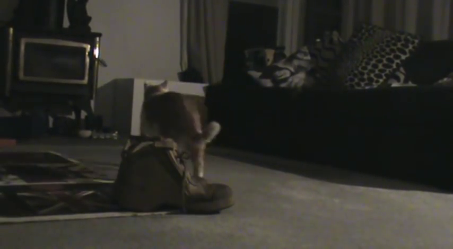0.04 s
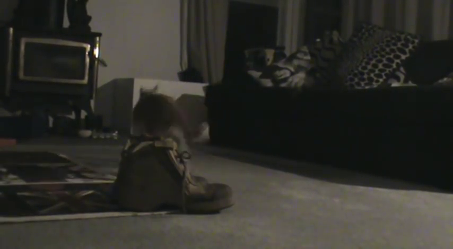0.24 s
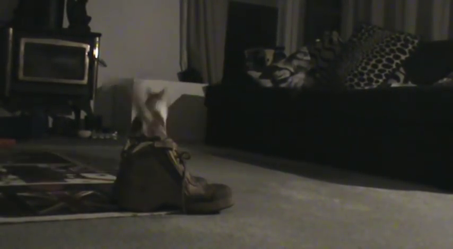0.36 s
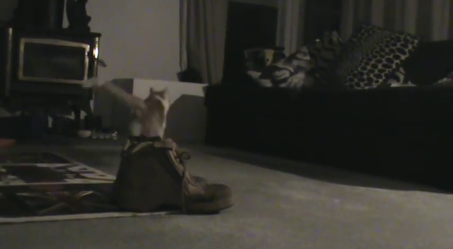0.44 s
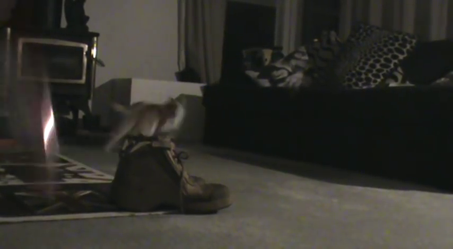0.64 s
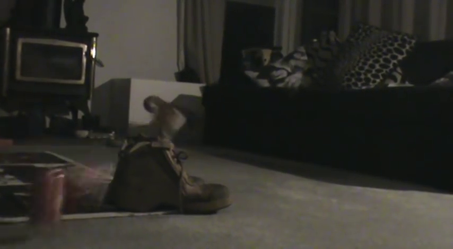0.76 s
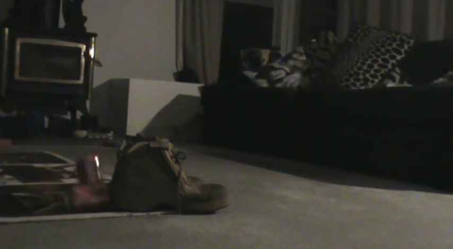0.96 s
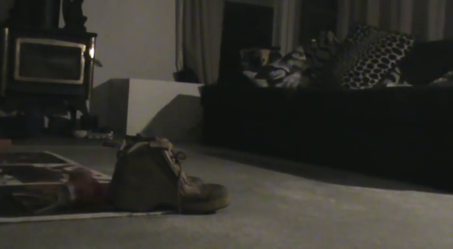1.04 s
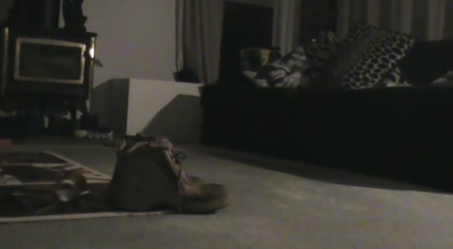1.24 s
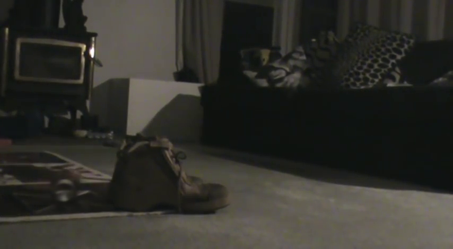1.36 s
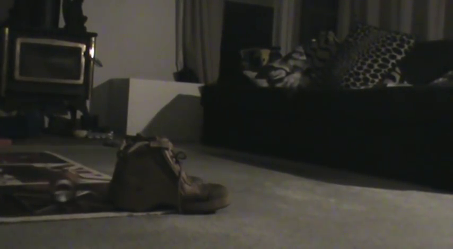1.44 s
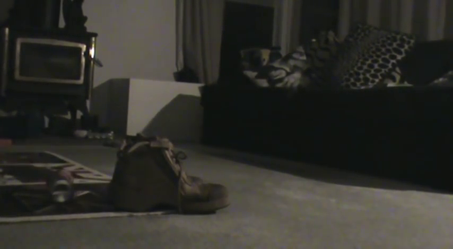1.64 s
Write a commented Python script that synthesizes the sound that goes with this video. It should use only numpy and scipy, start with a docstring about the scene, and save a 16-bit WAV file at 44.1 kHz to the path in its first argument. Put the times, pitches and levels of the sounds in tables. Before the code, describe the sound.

Metal cans clatter across a quiet living room, pulled by a running cat. Faint scraping and low thumps come first, then a loud, close burst of bright rattling that thins into a few hollow knocks over a low hum.

```python
"""Empty tin cans, dragged by a cat bolting across a quiet living room.
The cans scrape in three tugs, crash together close by, tumble with ringing rims and settle on the rug.
Scrapes and crashes are dense tiny contacts driving the wall modes; single knocks ring damped modes.
Paws and cans thud on the floor; a low hum fills the room."""
import sys
import numpy as np
from scipy import signal
from scipy.io import wavfile
from scipy.ndimage import uniform_filter1d

SR = 44100
rng = np.random.default_rng(int(sys.argv[2]) if len(sys.argv) > 2 else 0)


def generate_wav(signal):
    """Clip the signal to [-1, 1] and save it as 16-bit WAV at the path in sys.argv[1]."""
    frames = np.transpose(np.atleast_2d(signal))
    scaled = np.clip(frames, -1, 1) * 32767
    pcm = np.round(scaled).astype(np.int16)
    wavfile.write(sys.argv[1], SR, pcm)


N = 74970

# room hum (frequency [Hz], level [dB])
HUM_TONES = [(145.5, -54.5), (54, -61), (1260, -76), (1157, -80)]
# air noise (frequency [Hz], gain [dB])
AIR_SHAPE = [(25, -7.5), (60, -3), (110, -14), (220, -27.5), (400, -17), (800, -24.5), (1200, -24.5),
             (2000, -30), (7700, -32.5), (16000, -32.5)]
# surges within the tugs
# (time [s], rise [s], hold [s], t60 [s], level [dB], low-mid [dB], treble [dB], ring [dB])
SURGES = [(0.139, 0.089, 0.011, 0.085, -48, 13, 10, 10), (0.189, .042, 0.019, 0.26, -27.5, -1, 2, 2.5),
          (0.322, 0.0077, 0.062, 0.18, -41.5, 7.5, -7, -2.5),
          (0.423, .002, 0.014, 0.14, -34.5, 2.5, 6.5, -11), (.436, 0.014, .01, 0.26, -35.5, -3.5, -0.5, -6),
          (0.511, 0.0093, .012, .12, -38, -27, 11, -8), (0.565, 0.0041, 0.081, .1, -36.5, 7, 6, -20.5),
          (0.606, 0.0047, 0.077, 0.24, -35, -4.5, 1.5, 1.5),
          (0.671, 0.0091, 0.026, 0.17, -45.5, 2, 0.5, -10.5)]
# scraping (frequency [Hz], gain [dB])
SCRAPE_SHAPE = [(100, -40.5), (300, -8.5), (700, 1), (1100, -1), (1900, -4), (2800, -5), (4200, 6),
                (5900, 2.5), (7400, -7.5), (10500, -7), (16000, -20.5)]
# dragged can wall (frequency [Hz], level [dB], t60 [s])
DRAG_MODES = [(378, -19, .12), (530, -15, .16), (980, -22, .1), (1140, -21, .15), (1240, -20, .25),
              (1500, -20, .2), (1812, -16, .25), (2420, -19, .35), (3070, -21, .2), (3750, -19, .14),
              (4130, -17, .14), (5210, -18, .1), (5550, -19, .1), (6020, -18, .12), (8500, -24, .1)]
# drag ticks (time [s], level [dB])
TICKS = [(.2002, -25.5), (.2321, -18), (.309, -39), (.322, -38.5), (.346, -37), (.366, -35.5), (.381, -26),
         (.391, -35), (.439, -24), (.4465, -19.5), (.4515, -29), (.523, -35.5), (.5635, -29.5), (.579, -32),
         (.611, -24.5), (.629, -24)]
# collisions (time [s], strike [dB], chatter [dB], hold [s], t60 [s], low-mid [dB], treble [dB])
CRASHES = [(0.7154, -16, -19.5, 0.011, 0.3, 5, 4), (0.732, -13, -16.5, 0.034, 0.075, -1, -2),
           (0.755, -9, -24, 0.004, 0.096, 8.5, 3), (0.771, -28, -18.5, 0.0033, 0.12, 2, -8),
           (0.79, -19, -17, 0.023, .14, -9, 1.5), (.809, -13, -22.5, 0.023, 0.22, -1.5, -1),
           (0.855, -22, -26, 0.0096, 0.041, 1, 7), (.884, -24, -19.5, 0.029, .18, 5.5, -5),
           (0.928, -13.5, -30.5, 0.014, 0.45, 7.5, -7), (.937, -12, -24, 0.033, 0.076, 0, -0.5),
           (0.98, -24, -33.5, 0.0092, 0.088, 0, 14), (.987, -29, -24, 0.043, 0.25, -6.5, 3),
           (1.007, -9.5, -23.5, 0.02, 0.22, 6, 0.5), (1.052, -21, -21, 0.008, 0.22, -1.5, -8),
           (1.067, -9.5, -40, 0.0076, 0.092, -6, 1), (1.094, -13, -29.5, 0.014, 0.29, 2, 0),
           (1.113, -35, -30, 0.0044, .1, -11, 10.5), (1.124, -16.5, -25, 0.035, 0.097, -5.5, 3),
           (1.136, -19.5, -35, 0.004, 0.18, -2, 8), (1.153, -31, -33, 0.019, 0.26, -13, 9),
           (1.183, -35, -31.5, 0.015, 0.3, 2, -30), (1.226, -21, -30, 0.016, .12, 6.5, 0.5),
           (1.246, -19, -34, .005, 0.11, 4, -2), (1.262, -27, -32.5, .005, 0.076, 3, 6),
           (1.275, -22, -30.5, 0.02, 0.31, 3, 2), (1.369, -40, -38, .005, .1, 0, 9),
           (1.379, -25, -34.5, 0.029, 0.11, -3, 4.5), (1.4378, -20, -39, 0.015, 0.2, 4, 1),
           (1.45, -27, -39, 0.022, 0.13, -1, -1)]
# collision noise (frequency [Hz], gain [dB])
CRASH_SHAPE = [(70, -17), (150, 0), (240, -4), (400, -1.5), (720, -5.5), (1050, -3.5), (1550, -3.5),
               (2200, 1.5), (3000, 0), (3750, 6), (4600, 0.5), (5900, 2), (7100, -8), (9300, -4),
               (11600, -6), (16000, -18.5)]
# struck can wall (frequency [Hz], level [dB], t60 [s])
CRASH_MODES = [(368, -27, .15), (538, -24, .2), (1003, -17, .22), (1110, -23, .22), (1452, -21, .25),
               (1805, -16, .25), (2160, -21, .22), (2300, -22, .22), (2780, -23, .2), (3200, -21, .25),
               (3443, -20, .2), (3690, -18, .18), (3880, -20, .18), (4015, -22, .16), (4650, -23, .15),
               (6030, -23, .15)]

# strikes (time [s], level [dB], pitch [Hz]), each with its modes (pitch ratio, level [dB], t60 [s])
# can rims
RIM_HITS = [(.145, -53, 5400), (.165, -47, 5730), (.182, -32, 5420), (.566, -20.5, 5400),
            (.646, -15.5, 4990), (.658, -20, 5500), (.668, -17, 5300), (.6806, -15.5, 5270),
            (.691, -21, 4920), (.873, -5, 5266), (.883, -10, 5600), (.891, -14.5, 5380), (.8985, -15, 5030),
            (.9045, -13.5, 5220), (.929, -7, 5330), (.9385, -11.5, 5275), (.9785, -7, 5210),
            (.987, -7, 5115), (.994, -9, 5210), (1.0015, -6.5, 5120), (1.0145, -7, 5120),
            (1.033, -12, 5210), (1.044, -11, 5090), (1.058, -7, 5180), (1.072, -14, 5170),
            (1.086, -18.5, 5030), (1.126, -16.5, 5180), (1.134, -19, 5210), (1.146, -16.5, 5240),
            (1.154, -29, 5300), (1.265, -17, 5250), (1.274, -17, 5210), (1.296, -17.5, 5230),
            (1.312, -22, 5280), (1.322, -24, 5070), (1.395, -22, 5170), (1.412, -28, 5220)]
RIM_MODES = [(1, 0, .03), (1.045, -10, .02), (.992, -18, .18), (1.012, -19, .18), (.955, -19, .02),
             (1.14, -15, .035), (.695, -14, .05)]
# distant cans
CLANKS = [(.2005, -27.5, 1150), (.211, -34, 1490), (.335, -39, 1200), (.353, -42, 1450),
          (.4465, -21.5, 1790), (.4515, -24, 1550), (.465, -36, 1800), (.492, -35, 1263),
          (.648, -25.5, 1700), (.658, -26, 2360)]
CLANK_MODES = [(1, -2.5, 0.063), (1.17, -6.5, 0.028), (1.35, -5.5, 0.052), (0.822, -8, 0.048),
               (0.67, -4.5, 0.0067), (1.7, -9, 0.014), (1.3, -13, .015)]
# large can body
BOOMS = [(.212, -29.5, 378.5), (.254, -32, 385), (.446, -34, 387.2), (.628, -29, 374.4)]
BOOM_MODES = [(1, 0, .16), (1.42, -8, .13), (1.58, -11, .1), (4.8, -14, .25), (6.42, -14, .3)]
# floor
THUDS = [(.318, -27, 103.5), (.345, -30, 83), (.39, -39, 78), (.52, -34.5, 126.5), (.61, -23, 101),
         (.65, -41, 77), (.718, -15, 112.3), (.757, -24.5, 93), (.835, -27.5, 137), (.9, -27, 80),
         (.95, -52.5, 90), (1.03, -28.5, 71), (1.11, -29, 70), (1.228, -34, 155), (1.29, -38, 71.6),
         (1.33, -35.5, 121), (1.39, -36, 69)]
FLOOR_MODES = [(1.03, 1, 0.11), (0.73, -11.5, 0.25), (1.632, 0, .11), (2.7, -5, 0.051)]
# can base
BASE_HITS = [(.735, -17.5, 1024), (.762, -23, 1000), (.886, -22, 989), (1.008, -23, 1011),
             (1.066, -21, 1017), (1.112, -23.5, 1033), (1.164, -22, 1015), (1.3725, -20, 993),
             (1.3805, -35, 1002), (1.3955, -23.5, 1013), (1.4365, -26, 1108), (1.463, -31, 1109),
             (1.483, -39.5, 1083)]
BASE_MODES = [(1, -1, 0.15), (1.1, -10, 0.27), (1.26, -16, 0.26), (1.39, -12, 0.18), (1.94, -15.5, 0.22),
              (2.08, -12.5, 0.28), (2.88, -15.5, .2), (3.37, -14, 0.18)]
# close bump
BUMPS = [(.9715, -9, 364)]
BUMP_MODES = [(1.09, 2.5, 0.011), (0.84, -18, 0.03), (1.5, -0.5, 0.0063)]
# thin edges
EDGE_HITS = [(1.058, -19, 9500), (1.0665, -23, 9300), (1.073, -18, 9750), (1.387, -27.5, 11900),
             (1.395, -23.5, 10300), (1.402, -28.5, 12500), (1.444, -28, 9000), (1.452, -38, 9500),
             (1.458, -24, 9300)]
EDGE_MODES = [(1, 0, .028), (.93, -7, .015), (1.03, -7, .02)]

# room decay (frequency [Hz], t60 [s])
ROOM_T60 = [(100, .4), (500, .28), (1500, .32), (3200, .34), (5500, .29), (9500, .24), (14000, .21)]
# reverb side signal (frequency [Hz], gain [dB])
SIDE_SHAPE = [(80, -10), (180, -7), (350, 1.5), (1100, -5.5), (4000, -10), (9000, -1.5), (15000, -1.5)]
# left microphone, mirrored for the right (frequency [Hz], gain [dB])
LEFT_SHAPE = [(100, .2), (400, 1.2), (1200, .7), (2800, -.1), (6000, .3), (13000, .6)]

GRAINS_PER_S, GRAIN_SPREAD_DB, SNAP_DECAY_S = 5000, 3, 0.0013
SPOT_DETUNE_RATIO, SPOT_SPREAD_DB, BUZZ_BANDWIDTH_HZ = .006, 2.2, 330
LOW_CUT_HZ, CEILING_DB, RECOVERY_DB_PER_S = 42.5, -4, 350


def amp(db):
    """dB to gain."""
    return 10 ** (np.asarray(db) / 20)


def unit_rms(x):
    """Scale to rms 1."""
    return x / np.sqrt(np.mean(x ** 2) + 1e-20)


def lookup(points, hz):
    """Interpolate over log frequency."""
    points_hz, values = np.transpose(points)
    return np.interp(np.log(hz + 1), np.log(points_hz + 1), values)


def add(mix, time_s, sound):
    """Mix in at time_s."""
    part = mix[max(round(time_s * SR), 0):][:len(sound)]
    part += sound[:len(part)]


def colour(x, shape, keep_power=False):
    """Minimum-phase filter from (frequency [Hz], gain [dB]) points."""
    log_gain = np.log(amp(lookup(shape, abs(np.fft.fftfreq(2048, 1 / SR)))))
    taps = np.fft.ifft(np.exp(np.conj(signal.hilbert(log_gain)))).real[:1024]
    return signal.fftconvolve(x, taps / (np.linalg.norm(taps) if keep_power else 1))[:len(x)]


def tilt(x, low_db, treble_db):
    """Low-mid and treble shelves."""
    return colour(x, [(1300, low_db), (3400, 0.01), (5500, 0), (11000, treble_db)])


def grains(size):
    """Dense tiny contacts of uneven strength."""
    strength = amp(GRAIN_SPREAD_DB * np.minimum(rng.exponential(1, size), 4))
    return unit_rms(strength * rng.choice([-1, 1], size) * (rng.random(size) < GRAINS_PER_S / SR))


def snap(t):
    """Noise burst at first contact."""
    return np.exp(-t / SNAP_DECAY_S) * rng.choice([-1, 1], len(t))


def can_wall(drive, shape, modes, ring_db):
    """Contact noise plus the wall modes it rings, varied per contact spot."""
    t = np.arange(len(drive)) / SR
    ring = 0
    for (hz, db, t60_s), (shift, strength) in zip(modes, rng.standard_normal((len(modes), 2))):
        mode = amp(-60 * t / t60_s) * np.sin(2 * np.pi * hz * (1 + SPOT_DETUNE_RATIO * shift) * t)
        ring += amp(db + SPOT_SPREAD_DB * strength) * np.sign(shift) * mode / np.linalg.norm(mode)
    direct = colour(drive, shape, keep_power=True)
    return direct + amp(ring_db) * signal.fftconvolve(drive, ring)[:len(t)]


def strikes(hits, modes, attack_s, buzz_depth=0):
    """Damped modes at each hit's pitch; loose contact adds buzz."""
    out, t = np.zeros(N), np.arange(SR // 4) / SR
    lowpass = signal.butter(2, BUZZ_BANDWIDTH_HZ, fs=SR)
    attack = 1 - np.exp(-t / attack_s)
    for time_s, db, hz in hits:
        detunes = 1 + .004 * rng.standard_normal(len(modes))
        ring = sum(amp(mode_db - 60 * t / t60_s) * np.exp(2j * np.pi * hz * ratio * detune * t)
                   for (ratio, mode_db, t60_s), detune in zip(modes, detunes))
        noise = unit_rms(signal.lfilter(*lowpass, rng.standard_normal((2, len(t)))))
        buzz = 1 + buzz_depth * (noise[0] + 1j * noise[1])
        add(out, time_s, amp(db) * (ring * buzz).imag * attack)
    return out


def room_tone(air_db=-58):
    """Low hum over faint stereo air noise."""
    t = np.arange(N) / SR
    hum = sum(np.sqrt(2) * amp(db) * np.sin(2 * np.pi * (hz * t + rng.random())) for hz, db in HUM_TONES)
    mid, left, right = [unit_rms(colour(rng.standard_normal(N), AIR_SHAPE)) for _ in range(3)]
    return hum + amp(air_db) * (mid + .5 * np.array([left, right]))


def dragging():
    """Tugged cans scrape in surges; small ticks stand out."""
    out, t = np.zeros(N), np.arange(SR // 2) / SR
    for time_s, rise_s, hold_s, t60_s, db, low_db, treble_db, ring_db in SURGES:
        envelope = np.minimum(t / rise_s, 1) * amp(db - 60 * np.maximum(t - rise_s - hold_s, 0) / t60_s)
        drive = tilt(envelope * grains(len(t)), low_db, treble_db)
        add(out, time_s, can_wall(drive, SCRAPE_SHAPE, DRAG_MODES, ring_db))
    for time_s, db in TICKS:
        add(out, time_s, can_wall(amp(db) * snap(t), SCRAPE_SHAPE, DRAG_MODES, ring_db=-4))
    return out


def rim_rings():
    """Struck rims ring in close, high modes."""
    return strikes(RIM_HITS, RIM_MODES, attack_s=.0003, buzz_depth=.16)


def clanks():
    """Dragged cans knock farther off."""
    return strikes(CLANKS, CLANK_MODES, attack_s=.00024, buzz_depth=.25)


def booms():
    """A large can booms when jerked."""
    return strikes(BOOMS, BOOM_MODES, attack_s=.0029)


def floor_thuds():
    """Paws and cans ring low floor modes."""
    return strikes(THUDS, FLOOR_MODES, attack_s=.0023)


def crashes():
    """Cans collide: a sharp strike, then thin walls chatter."""
    out, t = np.zeros(N), np.arange(SR // 3) / SR
    for time_s, strike_db, chatter_db, hold_s, t60_s, low_db, treble_db in CRASHES:
        chatter = amp(chatter_db - 60 * np.maximum(t - hold_s, 0) / t60_s) * grains(len(t))
        drive = tilt(amp(strike_db) * snap(t) + chatter, low_db, treble_db)
        add(out, time_s, can_wall(drive, CRASH_SHAPE, CRASH_MODES, ring_db=-2.5))
    return out


def base_knocks():
    """A struck can base rings hollow."""
    return strikes(BASE_HITS, BASE_MODES, attack_s=.001, buzz_depth=.084)


def bump():
    """One close, heavily damped knock."""
    return strikes(BUMPS, BUMP_MODES, attack_s=.00043)


def edge_tinks():
    """Thin edges touch lightly and buzz."""
    return strikes(EDGE_HITS, EDGE_MODES, attack_s=.00031, buzz_depth=.51)


def reflections(taps_per_s=4000, predelay_s=.004):
    """Sparse room response, decaying per band."""
    taps = rng.standard_normal(SR // 2) * (rng.random(SR // 2) < taps_per_s / SR)
    hz, t, spectrum = signal.stft(taps, SR, nperseg=256)
    decay = amp(-60 * t / lookup(ROOM_T60, hz)[:, None])
    tail = signal.istft(spectrum * decay, SR, nperseg=256)[1]
    response = np.r_[np.zeros(round(predelay_s * SR)), tail]
    return response / np.linalg.norm(response)


def room(x, wet_db):
    """Centred direct sound plus mid/side reverb."""
    mid = x + amp(wet_db) * signal.fftconvolve(x, reflections())[:N]
    side = amp(wet_db) * colour(signal.fftconvolve(x, reflections())[:N], SIDE_SHAPE)
    return np.array([mid + side, mid - side])


def scene():
    """Room tone, distant dragging, thuds, close clatter."""
    return (room_tone()
            + room(dragging() + clanks(), wet_db=-6) * amp(-0.5)
            + room(rim_rings(), wet_db=-3) * amp(-3.5)
            + room(booms(), wet_db=-11) * amp(2.5)
            + room(floor_thuds(), wet_db=-4.5) * amp(-3)
            + room(crashes(), wet_db=-5.5) * amp(-1)
            + room(base_knocks(), wet_db=-6) * amp(-2)
            + room(bump(), wet_db=-13)
            + room(edge_tinks(), wet_db=-7.5) * amp(-1))


def record(dry):
    """Slightly unequal microphones, low cut, fast limiter, 16 kHz band limit."""
    right_shape = [(hz, -db) for hz, db in LEFT_SHAPE]
    pair = np.array([colour(dry[0], LEFT_SHAPE), colour(dry[1], right_shape)])
    pair = signal.sosfilt(signal.butter(3, LOW_CUT_HZ, "high", fs=SR, output="sos"), pair)
    over_db = np.maximum(20 * np.log10(abs(pair).max(0) + 1e-9) - CEILING_DB, 0)
    recovery_db = np.arange(N) * RECOVERY_DB_PER_S / SR
    reduction_db = np.maximum.accumulate(over_db + recovery_db) - recovery_db
    limited = pair / amp(uniform_filter1d(reduction_db, size=16))
    lowpass = signal.firwin(401, 16000, window=("kaiser", 9), fs=SR)
    return signal.oaconvolve(limited, lowpass[None], "same")


dry = scene()
out = record(dry)
generate_wav(out)
```